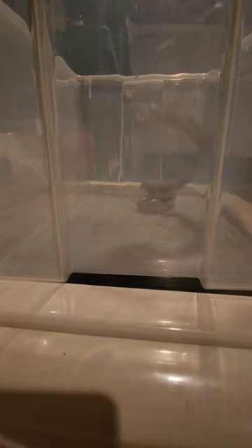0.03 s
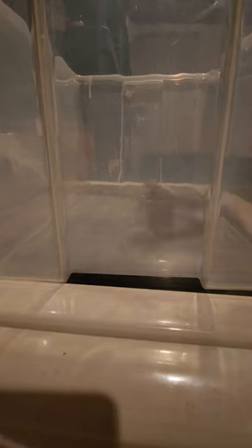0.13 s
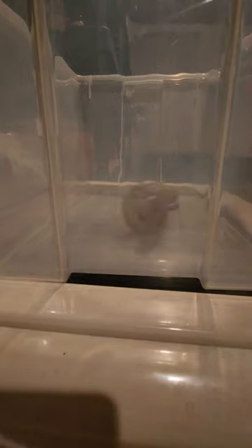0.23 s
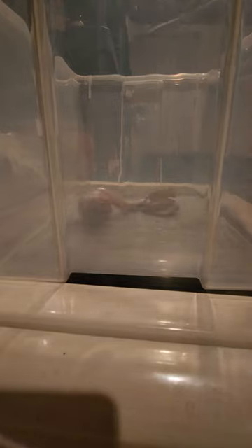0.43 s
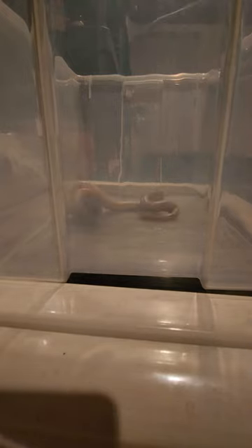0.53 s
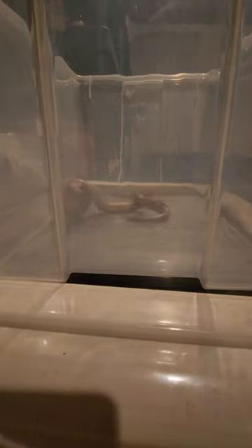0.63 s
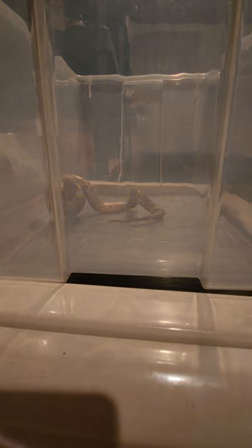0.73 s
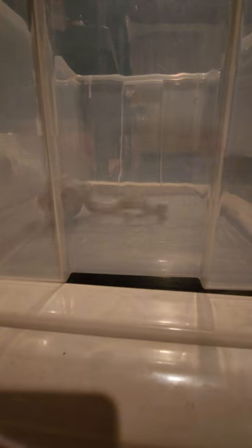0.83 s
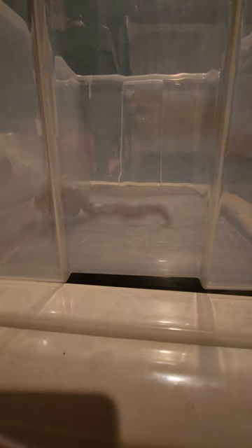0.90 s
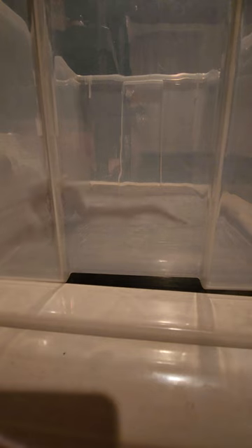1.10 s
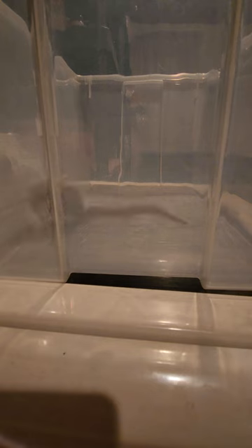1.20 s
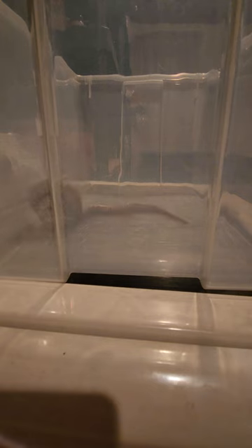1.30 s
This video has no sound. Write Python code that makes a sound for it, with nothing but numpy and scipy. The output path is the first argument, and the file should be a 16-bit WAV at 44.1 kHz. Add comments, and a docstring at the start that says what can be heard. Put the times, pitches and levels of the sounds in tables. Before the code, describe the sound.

A small snake thumps inside a thin plastic tub, close and slightly left. Light knocks at 0.1 seconds lead into loud, hollow thumps with sharp ticks from 0.2 to 0.5. Softer bumps and faint scale brushing follow. Near 0.95 comes another thump with a brief scuff, then weak bumps fade by 1.2. A steady low hum and soft air fill the small room throughout.

```python
"""In a small room, a small snake strikes and thrashes inside a thin plastic tub, close and a little left.
Its soft body thumps the panels and sets them ringing; its snout and the loose plastic tick.
Its scales brush the floor, the tub shudders while it moves, and once the scales scuff along the wall.
The room answers the thumps and ticks with a short tail, over a steady low mains hum and room air."""
import sys
import numpy as np
from scipy import signal
from scipy.fft import rfft, irfft, next_fast_len
from scipy.io import wavfile
from scipy.ndimage import uniform_filter1d

SR = 44100
rng = np.random.default_rng(int(sys.argv[2]) if len(sys.argv) > 2 else 0)


def unload_wav(signal):
    """Save mono or channel-first audio to the path in sys.argv[1] as 16-bit WAV at rate SR, clipped to [-1, 1]."""
    wavfile.write(
        sys.argv[1],
        SR,
        np.round(np.clip(np.atleast_2d(signal).T, -1, 1) * 32767).astype(np.int16),
    )


N = 59535
RING_SAMPLES, TICK_SAMPLES = 16384, 3072
WALL_PAN_DB, SCALE_PAN_DB = 6.5, 3


def undb(db):
    """Decibels to gain."""
    return 10 ** (np.asarray(db) / 20)


def unit(x):
    """Scale to rms 1."""
    return x / np.sqrt(np.mean(x ** 2))


def pan(db):
    """Stereo gains that put the left side db above the right."""
    return undb(np.array([[db], [-db]]) / 2)


def fade(age, t60_s):
    """Exponential decay that starts at age 0."""
    return (age >= 0) * np.exp(-np.log(1000) * np.maximum(age, 0) / t60_s)


def convolve(a, b):
    """Convolution cut to the length of the first sound."""
    size = next_fast_len(a.shape[-1] + b.shape[-1], True)
    return irfft(rfft(a, size) * rfft(b, size), size)[..., :a.shape[-1]]


def colour(x, points, tilt_db_per_octave=0):
    """EQ a sound through (freq_hz, gain_db) points and a tilt; rms 1."""
    hz, db = np.array(points, float).T
    size = next_fast_len(x.shape[-1], True)
    octave = np.log2(np.maximum(np.fft.rfftfreq(size, 1 / SR), 1))
    gain = undb(np.interp(octave, np.log2(hz), db + tilt_db_per_octave * np.log2(hz)))
    return unit(irfft(rfft(x, size) * gain, size)[..., :x.shape[-1]])


def wander(rate_hz):
    """Smooth random drift; rms 1."""
    hold = int(SR / rate_hz)
    steps = np.repeat(rng.standard_normal(N // hold + 1), hold)
    return unit(uniform_filter1d(steps, hold)[:N])


def add(out, sound, start_s):
    """Mix a short sound in at a time."""
    i = int(start_s * SR)
    out[:, i:i + sound.shape[-1]] += sound[:, :N - i]


def mains_hum(t):
    """Low mains tones, each wavering in level and phase."""
    # hum tones: pitch_hz, level_db
    tones = [(60, -62), (119, -49.5), (238, -51), (366, -61)]
    hum = np.zeros(N)
    for pitch_hz, level_db in tones:
        peak = np.sqrt(2) * undb(level_db + 2 * wander(rate_hz=8.4))
        phase = 2 * np.pi * (pitch_hz * t + rng.random()) + .3 * wander(rate_hz=6.13)
        hum += peak * np.sin(phase)
    return hum


def room_air():
    """A dark bed of noise, nearly mono in the bass and wide higher up."""
    # EQ of the air: freq_hz, gain_db
    air_eq = [(25, -28), (60, -2), (90, -20.5), (150, -1), (250, -7.5), (340, -13), (520, -14),
              (900, -19.5), (1500, -23.5), (2600, -29), (5000, -40.5), (10000, -49), (16000, -52)]
    wide_above_hz = 704
    hz = np.fft.rfftfreq(N, 1 / SR)
    mid, side = colour(rng.standard_normal((2, N)), air_eq)
    side = irfft(rfft(side) * (hz + wide_above_hz / 10) / np.hypot(hz, wide_above_hz), N)
    return undb(-48) * pan(0.5) * np.array([mid + side, mid - side])


def tub_ring(age):
    """The tub rings in four layers: flexing floor, main boom, upper modes and the wall's hollow knock."""
    # modes of the tub: pitch_hz, level_db, t60_s
    modes = [(51, -27, 0.14), (62.5, -7, 0.38), (83.1, -4.5, 0.17), (112, -4, .1), (158.9, 1, 0.14),
             (235.9, -2.5, 0.15), (247.8, -2.5, 0.15), (287.8, -7.5, .13), (382.6, -12, 0.14),
             (451, -22, 0.15), (639, -12, 0.066), (701, -25.5, 0.15), (771.5, -8, 0.068), (865, -8, 0.058),
             (950, -24.5, 0.048), (1132, -30.5, 0.27), (1220, -20.5, .13)]
    layer_edges_hz, floor_rise_s = [130, 200, 420], 0.007
    layers = np.zeros((4, len(age)))
    for pitch_hz, level_db, t60_s in modes:
        layer = np.searchsorted(layer_edges_hz, pitch_hz)
        layers[layer] -= undb(level_db) * np.sin(2 * np.pi * pitch_hz * age) * fade(age, t60_s)
    floor, boom, upper, wall = layers
    swing = 1 - np.exp(-age / floor_rise_s)  # the heavy floor takes a moment to swing
    return pan(3.5) * floor * swing, pan(3.5) * boom, pan(0.5) * upper, pan(WALL_PAN_DB) * wall


def scale_brush():
    """Scales catch and slip on the plastic floor in a grainy brush."""
    # EQ of scales on plastic: freq_hz, gain_db
    scale_eq = [(200, 2.5), (600, 14.5), (1500, 4.5), (2600, 1), (5000, -8), (9000, -17), (13000, -10.5),
                (16000, -41)]
    grains = rng.standard_normal((2, N)) * undb(wander(rate_hz=250))
    return undb(-54) * pan(SCALE_PAN_DB) * colour(grains, scale_eq)


def tub_shudder(age):
    """The sliding snake keeps the tub's low modes trembling."""
    floor, boom, upper, _ = tub_ring(age)
    ring = undb(4.5) * floor + boom + undb(6.5) * upper
    return undb(-42) * unit(convolve(rng.standard_normal(N), ring))


def slither(t):
    """Brush and shudder swell and ebb together with the snake's effort."""
    # how hard the snake slithers: time_s, level_db
    effort_curve = [(0, -2), (.12, 0), (.2, -1.5), (.33, 5.5), (.45, -0.5), (.6, 0.5), (.73, -8),
                    (.88, -11), (.96, 6), (1.06, -4), (1.15, -7.5), (1.35, -9)]
    effort = undb(np.interp(t, *np.array(effort_curve).T))
    return effort * (scale_brush() + tub_shudder(t[:RING_SAMPLES]))


def plastic_ticks(age):
    """Brief bright cracks of snout and loose plastic."""
    # hard ticks: start_s, level_db, tilt_db_per_octave, t60_ms
    ticks = [(0.0771, -15.5, -5, 31), (.1585, -21, -3, 59), (.2184, 2, -1.5, 17.7), (0.2233, -1.5, 0, 24),
             (0.2274, -1.5, -2.5, 33), (.2390, -7.5, -0.5, 49), (0.2508, -0.5, 3, 2.7),
             (0.2501, -4.5, 9, 13), (.2560, -17.5, 7.5, 84), (.3950, -15.5, -1, 90), (.4490, -2.5, -8, 20),
             (.5075, -20, -1, 19), (.5960, -22.5, -1, 54), (0.6363, -19.5, -0.5, 17),
             (.9602, -12, 1.5, 9.4)]
    # EQ of a tick: freq_hz, gain_db
    tick_eq = [(200, -23), (600, 7.5), (900, 7.5), (1700, -3), (2300, 7), (3200, -2.5), (4500, -6),
               (6200, -12), (7600, -7.5), (9000, -17), (13000, -15), (16000, -18)]
    out = np.zeros((2, N))
    for start_s, level_db, tilt_db_per_octave, t60_ms in ticks:
        noise = colour(rng.standard_normal((2, len(age))), tick_eq, tilt_db_per_octave)
        add(out, undb(level_db - 30) * noise * fade(age, t60_ms / 1000), start_s)
    return out


def body_thumps(age):
    """Each soft blow pushes the wall and rings the modes and panels; a longer contact is duller."""
    # body blows: time_s, level_db, contact_ms, floor_db, upper_db, wall_db, pitch_ratio
    blows = [(.0810, -22, 3.8, -13, -1, 12.5, 0.89), (0.107, -21.5, 8.5, 7, 9.5, 9, 1.0),
             (0.2184, -17, 1.5, -11, 6.5, 1, 1.0), (0.229, -2, 1.66, -4, 0, 0, 1.02),
             (0.2415, -6, 1.62, -15, -21, -1, 1.0), (.2550, -10.5, 1.54, 5.5, -0.5, 3, 1.0),
             (0.272, -14, 3.85, -9, 8.5, 9, 1.0), (0.327, -13, 6.7, 2.5, 6, 15, 1.03),
             (.3430, -18, 4.6, 9, 6.5, 13, 1.03), (0.362, -22, 3.6, 0, 1.5, -4, 1.1),
             (.4010, -21.5, 2.2, -17, 7.5, 4, 1.0), (0.428, -14, 5.1, 4, -3, 10, 1.14),
             (0.4504, -0.5, 2.8, 1, 2.5, 5.5, 1.0), (0.471, -15.5, 8.3, 2.5, 12, -1, 1.0),
             (0.536, -31.5, 2.9, -0.5, 8, 13, 1.0), (0.581, -32, 4.7, 19.5, 13.5, -4, 1.01),
             (0.649, -23.5, 4.3, -6, -21, 3, 1.0), (0.817, -30.5, 3.1, -10, 5.5, -10, 0.974),
             (0.9361, -6, 2.65, -19, -16, -1, 1.06), (0.9614, -9.5, 1.42, 1.5, -3.5, 4.5, 1.0),
             (0.98, -17.5, 1.44, -18, 2, -1, 0.92), (1.024, -23.5, 5.6, 12.5, 1.5, 9, 1.0),
             (1.075, -31, 7.44, 12, -5.5, 2, 1.0), (1.17, -31, 6.7, 3, 12, -5, 1.0)]
    # EQ of the dense panel ring: freq_hz, gain_db
    panel_eq = [(150, -18), (450, -1.5), (850, -2.5), (1300, -9), (2500, -8.5), (6000, -20.5)]
    lead_s, settle_s = .01, 0.036
    floor, boom, upper, wall = tub_ring(age)
    from_peak_ms = (age[age < 2 * lead_s] - lead_s) * 1000
    wall_push = undb(-7) * (age == 0) * SR / 1000  # an impulse: the contact pulse itself is heard
    damping = fade(np.maximum(age - settle_s, 0), t60_s=0.36)  # the body settles against the panel
    out = np.zeros((2, N))
    for time_s, level_db, contact_ms, floor_db, upper_db, wall_db, pitch_ratio in blows:
        contact = np.exp(-np.pi * (np.pi * from_peak_ms / contact_ms) ** 2)
        modes = undb(floor_db) * floor + boom + undb(upper_db) * upper + undb(wall_db) * wall
        pitched = np.array([np.interp(age * pitch_ratio, age, side) for side in modes])
        panel = colour(rng.standard_normal((2, RING_SAMPLES)), panel_eq) * fade(age, t60_s=0.19)
        ring = pitched + pan(WALL_PAN_DB) * (undb(wall_db - 16.5) * panel + wall_push)
        thump = convolve(ring * damping, contact / contact.sum())
        add(out, undb(level_db - 12) * thump, time_s - lead_s)
    return out


def room_tail(x):
    """The small room's short diffuse answer, different on each side."""
    predelay_s = 0.0041
    decay = fade(np.arange(RING_SAMPLES) / SR - predelay_s, t60_s=0.14)
    tail = rng.standard_normal((2, RING_SAMPLES)) * decay
    return convolve(x, unit(tail) / np.sqrt(RING_SAMPLES))


def wall_scuff(t):
    """One quick hiss: scales wipe along the wall as the snake presses into the corner."""
    # EQ of scales on the wall: freq_hz, gain_db
    scuff_eq = [(2000, -27), (4800, -6), (6200, 3), (7600, -5), (9500, -15), (15000, -24)]
    peak_s, width_s = .942, .011
    swell = np.exp(-((t - peak_s) / width_s) ** 2)
    return undb(-60) * pan(SCALE_PAN_DB) * swell * colour(rng.standard_normal((2, N)), scuff_eq)


def lag_right(x, lag_ms):
    """The right side is a little farther from the tub and hears it later."""
    samples = np.arange(N)
    return np.array([x[0], np.interp(samples - lag_ms * SR / 1000, samples, x[1])])


def scene():
    """The snake in its tub and the room's answer, over hum and air."""
    t = np.arange(N) / SR
    bed = mains_hum(t) + room_air()
    sliding = slither(t) + wall_scuff(t)
    thumps = body_thumps(t[:RING_SAMPLES])
    ticks = plastic_ticks(t[:TICK_SAMPLES])
    direct = lag_right(thumps + pan(11.5) * ticks + sliding, lag_ms=.33)
    reverb = room_tail(undb(-14.5) * thumps[0] + undb(-6) * ticks[0])
    return direct + reverb + bed


def record(dry):
    """Roll off the deepest bass and cut the very top steeply."""
    low_cut_hz, high_cut_hz = 54, 15700
    thinned = signal.sosfilt(signal.butter(2, low_cut_hz, "high", fs=SR, output="sos"), dry)
    return signal.sosfilt(signal.ellip(10, .2, 80, high_cut_hz, fs=SR, output="sos"), thinned)


dry = scene()
out = record(dry)
unload_wav(out)
```